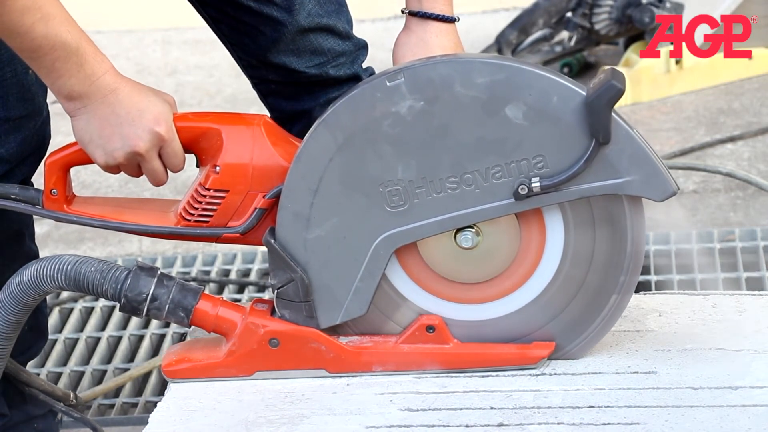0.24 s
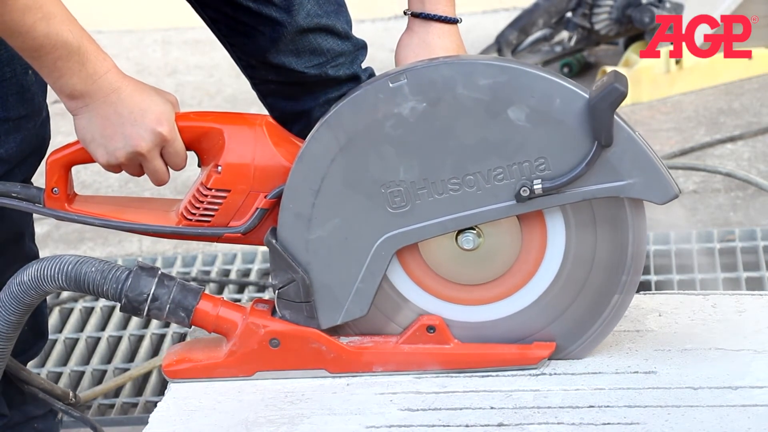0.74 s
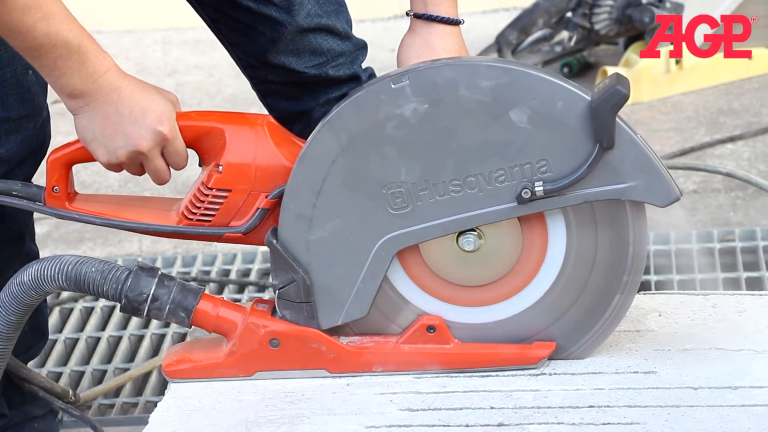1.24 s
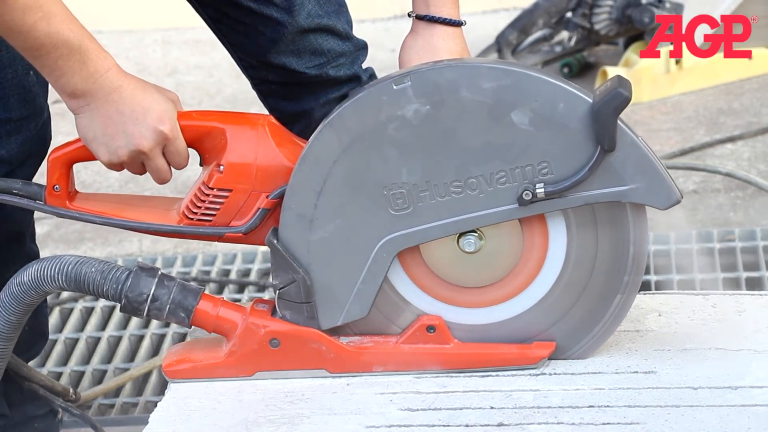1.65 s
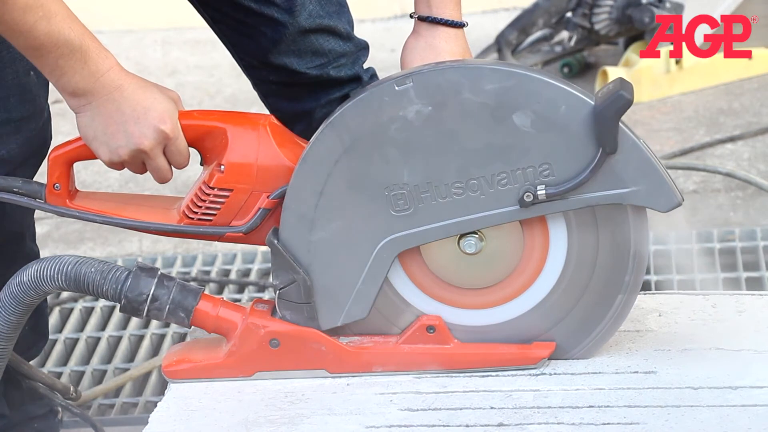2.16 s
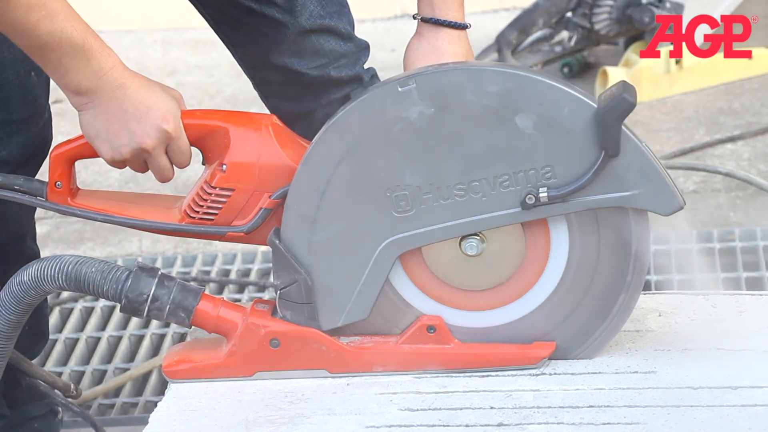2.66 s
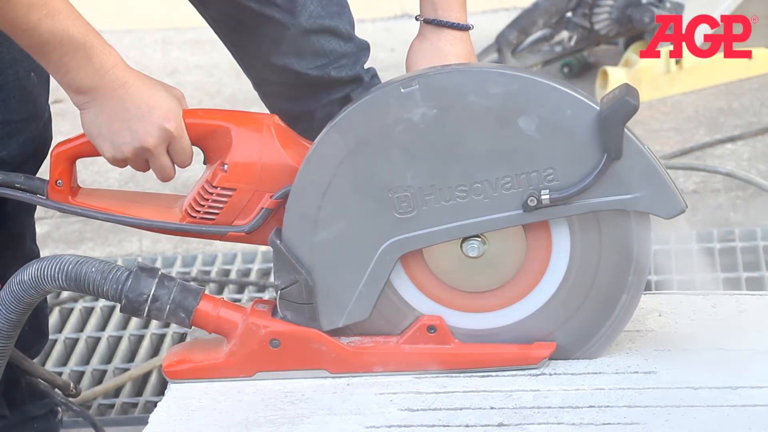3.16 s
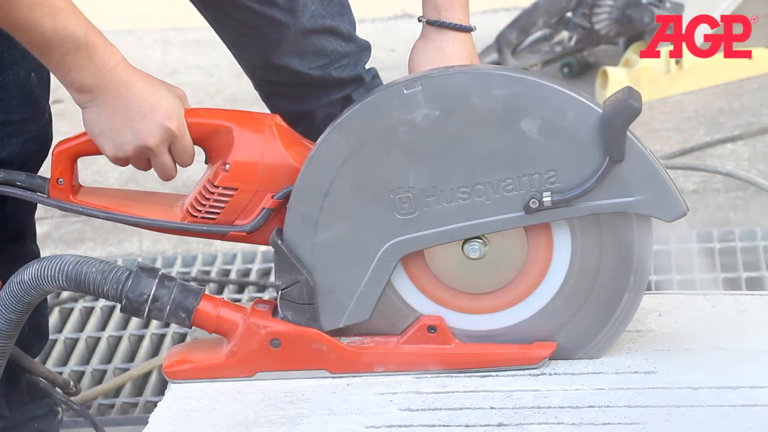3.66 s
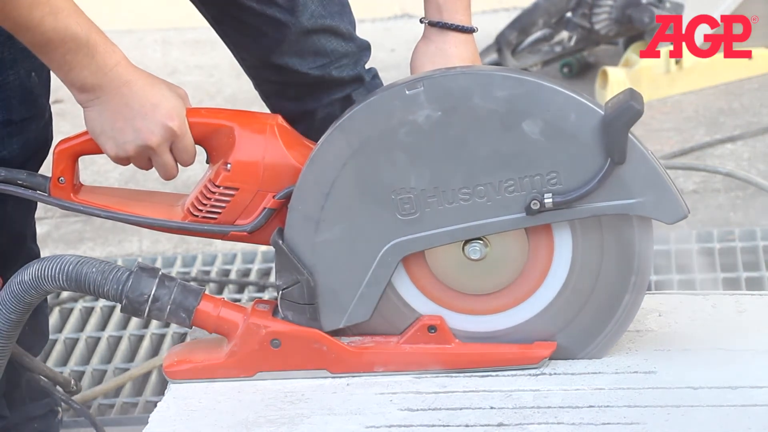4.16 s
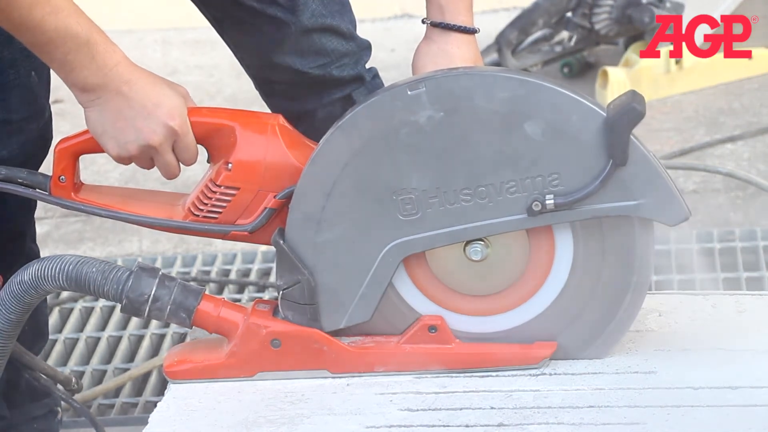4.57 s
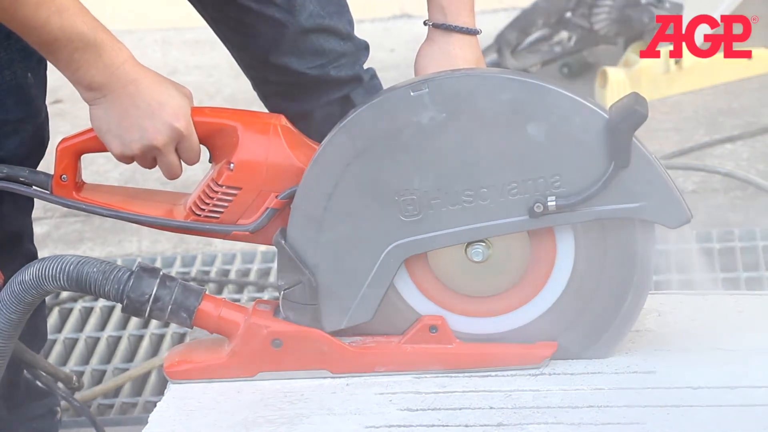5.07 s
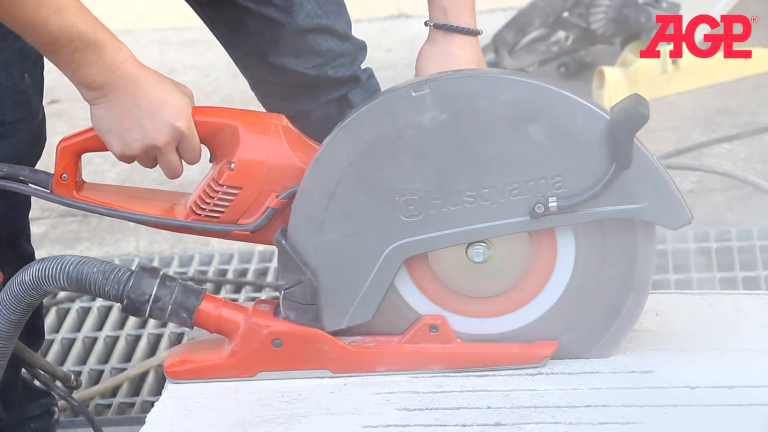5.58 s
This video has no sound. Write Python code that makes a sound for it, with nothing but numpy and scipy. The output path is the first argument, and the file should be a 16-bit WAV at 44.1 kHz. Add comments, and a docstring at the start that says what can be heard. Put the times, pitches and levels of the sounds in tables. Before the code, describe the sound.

A constant, harsh stone-cutting noise fills the whole stretch: shrill ringing blade, broader metallic rattle from its guard, crushed grit spraying, and a low fan rush. Small hard spots make brief squealing flares. The low drone flutters and surges irregularly, and late in the cut the loaded motor strains more heavily. Close stereo microphone in an open yard, slightly stronger on the left, almost no reverberation.

```python
"""An electric cut-off saw sinks its diamond blade evenly into a concrete slab, outdoors, close by.
From the first bite, rubbed grit rings the steel disc (sharp modes) and guard (broad modes), harder once a turn;
crushed grains hiss, the geared housing drones under a varying load, and the fan rushes below shaft tones and hums.
As the cut deepens the blade slows, its modes glide and many are damped, the grinding grows brighter,
and the motor strains louder."""
import sys
import numpy as np
from scipy import signal
from scipy.fft import rfft, irfft, next_fast_len
from scipy.io import wavfile
from scipy.ndimage import map_coordinates

SR = 44100
rng = np.random.default_rng(int(sys.argv[2]) if len(sys.argv) > 2 else 0)


def transcribe(signal):
    """Save signal, clipped to [-1, 1], as a 16-bit WAV file at the path in sys.argv[1]."""
    frames = np.atleast_2d(signal).T
    limited = np.clip(frames, -1, 1)
    pcm = np.round(limited * 32767).astype(np.int16)
    wavfile.write(sys.argv[1], SR, pcm)


N = 256220
TIME = np.arange(N) / SR
SIZE = next_fast_len(N)
HZ = np.fft.rfftfreq(SIZE, 1 / SR)
MAINS_HZ = 60

# blade speed: (time [s], speed [turns/s])
BLADE_SPEED = [(0, 51.35), (.55, 50.9), (1.2, 50.72), (2, 50.25), (2.3, 49.7), (2.8, 48.5), (3.3, 47.75),
               (3.8, 47.05), (4.6, 46.85), (4.9, 46.5), (5.3, 45.2), (5.6, 44.6), (5.81, 44.5)]
# likeness of the grinding in the two ears: (frequency [Hz], correlation [-])
EAR_LIKENESS = [(600, 1), (1400, 0.87), (3000, 0.9), (4500, 0.66), (6800, 0.39), (10000, 0.084),
                (13000, 0.6)]


def amp(db):
    """Decibels to gain."""
    return 10 ** (np.asarray(db) / 20)


def unit(x):
    """Scales to rms 1."""
    return x / np.sqrt(np.mean(x ** 2) + 1e-20)


def curve(rows):
    """Interpolates a (time, value) table to every sample."""
    return np.interp(TIME, *np.transpose(rows))


def spectrum(rows, axis=1):
    """Interpolates one table column over log frequency."""
    columns = np.transpose(rows)
    return np.interp(np.log(HZ + 1), np.log(columns[0] + 1), columns[axis])


def colour(x, gain):
    """Filters by a gain per frequency bin."""
    return irfft(rfft(x, SIZE) * gain, SIZE)[..., :N]


def causal(gain):
    """Minimum-phase filter of the given gains: it rings only after it is struck."""
    cepstrum = irfft(np.log(gain), SIZE)
    return gain * np.exp(1j * rfft(cepstrum * np.sign(np.fft.fftfreq(SIZE))).imag)


def noise():
    """White noise, rms 1."""
    return rng.standard_normal(N)


def wander(rate_hz):
    """Low-passed noise, rms 1."""
    return unit(colour(noise(), 1 / (1 + (HZ / rate_hz) ** 4)))


def pan(db):
    """Left and right gains for a left-minus-right level difference."""
    return amp(np.array([[.5], [-.5]]) * db)


def cut_depth(t):
    """Even feed: 0 at the first bite, 1 at full depth."""
    return t / TIME[-1]


def staged(depth, stages):
    """Interpolates values given at the first bite, half way in and at full depth."""
    return np.interp(depth, [0, .5, 1], stages)


def contact(turns, once_db=1.23, chatter_db=0.86, chatter_hz=90, lurch_db=0.42, lurch_hz=12):
    """Contact force: the rim, out of true, presses harder once a turn; stones in the concrete make it chatter."""
    once_per_turn = once_db * np.cos(2 * np.pi * turns)
    chatter = chatter_db * wander(chatter_hz)
    lurch = lurch_db * wander(lurch_hz)
    return unit(amp(once_per_turn + chatter + lurch))


def rim(turns, depth, memory_turns=14, size=1024):
    """The same diamonds pass every turn, so part of the rubbing repeats, changing with wear: (share, pattern)."""
    # repeating share of the rubbing power [-]: first bite, half way in, full depth
    repeat_share = [.22, .11, .14]
    keep = np.exp(-1 / memory_turns)
    fresh = rng.standard_normal((2, int(turns[-1]) + 2, size))
    # one-pole smoothing from turn to turn at each point of the rim
    worn = signal.lfilter([np.sqrt(1 - keep ** 2)], [1, -keep], fresh[:, 1:], axis=1, zi=keep * fresh[:, :1])[0]
    pattern = np.array([map_coordinates(side.ravel(), [turns * size], mode="nearest") for side in worn])
    return staged(depth, repeat_share), unit(pattern)


def scrape(diamonds):
    """Two unrelated rubbing streams: fresh grit plus the rim pattern."""
    share, pattern = diamonds
    grit = rng.standard_normal((2, N), np.float32)
    return np.sqrt(1 - share) * grit + np.sqrt(share) * pattern


def ring(force, diamonds, hz, width_hz, skirt):
    """Two-ear spectrum of a rubbed mode: one pole, with steeper flanks beyond skirt half-widths."""
    shared, opposed = rfft(np.float32(force * scrape(diamonds)), SIZE)
    near = abs(HZ - hz) < 5 * skirt * width_hz
    same = np.interp(HZ[near], *np.transpose(EAR_LIKENESS))
    side = np.array([[1], [-1]])
    drive = shared[near] * np.sqrt(1 + same) + side * opposed[near] * np.sqrt(1 - same)
    detune = 2j * (HZ[near] - hz) / width_hz
    response = np.zeros((2, len(HZ)), np.complex64)
    response[:, near] = drive / (1 + detune) / (1 + detune / skirt)
    return response


def strength(hz, stages_db, stone_width_hz=70):
    """Mode gain over time: cut depth damps some modes and wakes others; hard stones make near ones flare."""
    # hard stones: (time [s], 1/e half length [s], frequency [Hz], flare [dB])
    stones = [(.33, 0.05, 3825, 6), (.66, 0.034, 3900, 7), (0.698, .1, 2760, 4), (.75, 0.25, 2848, 2),
              (1.418, 0.091, 3250, 7), (1.53, .07, 4255, 5), (2.15, 0.2, 2747, 0.5), (2.15, 0.28, 5500, 7),
              (2.6, 0.066, 2747, 3), (2.82, 0.032, 2747, 6), (2.848, .06, 3870, 2), (3.07, .07, 5500, 7),
              (3.378, 0.051, 3920, 2), (3.8, 0.1, 4760, 6), (3.8, .1, 6195, 9), (4.498, .12, 2800, 1),
              (4.52, .07, 4446, 3), (5.77, .05, 4800, 5)]
    steps = np.linspace(0, TIME[-1], num=400)
    db = staged(cut_depth(steps), stages_db)
    for at_s, length_s, stone_hz, flare_db in stones:
        in_time = ((steps - at_s) / length_s) ** 2
        in_pitch = ((hz - stone_hz) / stone_width_hz) ** 2
        db = db + flare_db * np.exp(-in_time - in_pitch)
    return np.interp(TIME, steps, amp(db))


def blade(force, diamonds, depth, skirt=5.3, hold=0.14):
    """The disc sings in sharp modes that glide as the blade slows and sinks; friction evens out their swing."""
    # disc modes: (frequency half way in [Hz], drift over the cut [Hz], width [Hz], level at first bite [dB],
    # level half way in [dB], level at full depth [dB], left minus right [dB])
    modes = [(1875, -20, 48, -41.0, -41.5, -47.0, -6), (2147, -25, 26, -43.0, -44.0, -51.5, -7),
             (2290, -9, 50, -42.5, -39.0, -40.0, -4), (2464, 5, 46, -40.0, -38.5, -38.5, -5),
             (2746, -28, 22, -34.3, -31.2, -36.5, -2), (2848, -4, 27, -34, -35, -38, -5),
             (3049, -33, 24, -37.5, -39.0, -39.5, -6), (3276, -36, 32, -38.5, -39, -48.0, -2),
             (3852, 21, 39, -32.0, -33.0, -37, -5), (3904, -34, 31, -30.0, -37.5, -40.0, -3),
             (4208, -4, 12, -50.0, -40.5, -37.5, -9), (4247, -8, 14, -44.0, -36, -40.0, -5),
             (4280, -6, 20, -35.5, -47, -39.5, -5), (4350, -29, 33, -36, -40.5, -40, -6),
             (4446, 8, 20, -37.5, -36.0, -38.0, -6), (4493, -6, 32, -40.0, -39.0, -42.5, -10),
             (4692, 0, 23, -34.5, -38.0, -48.5, -4), (4726, 12, 20, -53.0, -35.5, -35, -3),
             (4796, 3, 16, -40.5, -38.0, -37.5, -4), (4855, -61, 33, -39.5, -39.0, -37.5, 0),
             (5305, -20, 50, -54, -42, -37, -4), (5360, -6, 16, -40, -39.5, -47, -8),
             (5492, -46, 28, -35.3, -36, -58, 1), (5736, -54, 30, -46, -48, -57.0, 4),
             (5865, 62, 24, -51.5, -48.0, -44.5, -15), (6197, -16, 11, -58, -44.0, -42.5, -1),
             (6378, 60, 40, -52.0, -43.5, -46.0, -4), (7443, 112, 45, -44.5, -44.0, -43.5, -8),
             (7735, 14, 36, -42.5, -42.5, -46, -5), (7937, 3, 30, -44.5, -48.0, -46.5, 3),
             (8224, 7, 20, -50, -47, -46, -7), (8595, 24, 20, -42.5, -46.0, -54.0, -3),
             (9041, 39, 197, -48.0, -42.0, -46.5, -2), (9303, 34, 23, -51.5, -48.0, -54.0, -6),
             (10194, 60, 97, -49, -47.5, -50, -6), (10660, 0, 150, -51, -50, -50, -3),
             (10885, 40, 35, -49, -47, -46.5, -3), (11605, -55, 60, -51.5, -49.0, -56.5, -3)]
    out = np.zeros((2, N))
    glide = 2 * np.pi * np.cumsum(depth - .5) / SR
    for hz, drift_hz, width_hz, *stages_db, side_db in modes:
        # one-sided spectrum gives a complex signal, so its pitch can be shifted
        song = np.fft.ifft(ring(force, diamonds, hz, width_hz, skirt), SIZE)[:, :N]
        swing = (song.real ** 2 + song.imag ** 2).sum(0)
        shift = np.float32(drift_hz * glide)
        shifted = song.real * np.cos(shift) - song.imag * np.sin(shift)
        held = shifted / (swing + swing.mean() / 10) ** (hold / 2)
        out += unit(held) * pan(side_db) * strength(hz, stages_db)
    return out


def guard(force, diamonds):
    """The guard rings in broad modes of fixed pitch."""
    # guard modes: (frequency [Hz], width of each of two equal poles [Hz], level at first bite [dB],
    # level half way in [dB], level at full depth [dB], left minus right [dB])
    modes = [(933, 130, -45.5, -47.0, -47.0, -2), (1373, 584, -38.0, -39.0, -41.0, -3),
             (1777, 118, -49.5, -54.5, -46.0, -5), (2117, 309, -40.5, -40.5, -41.5, -2),
             (2564, 190, -47.5, -40.5, -37.0, -5), (2660, 284, -42.5, -40.0, -41.0, -4),
             (3117, 93, -39.5, -39.5, -44.5, -7), (3333, 440, -37.5, -36.5, -36.5, -3),
             (3778, 278, -41.0, -38.5, -33.5, -7), (4198, 444, -33.5, -32.5, -34.5, -1),
             (4575, 254, -41.0, -38.5, -35.0, -7), (4742, 251, -43.5, -43.0, -42.0, -3),
             (5257, 983, -36.0, -34.5, -34.0, -2), (5627, 467, -41.0, -38.5, -35, -1),
             (6392, 629, -40.0, -38.0, -37.5, -1), (6862, 378, -40.0, -36.5, -35.5, -4),
             (7341, 103, -55.0, -47.5, -44.0, -2), (7995, 340, -45.0, -44.0, -42.0, -9),
             (9686, 417, -43.0, -41.5, -41.5, -3)]
    out = np.zeros((2, N))
    for hz, width_hz, *stages_db, side_db in modes:
        tone = irfft(ring(force, diamonds, hz, width_hz, skirt=1.0), SIZE)[:, :N]
        out += unit(tone) * pan(side_db) * strength(hz, stages_db)
    return out


def grinding(force, diamonds, depth, grain_db=1.5, follow=0.55, patchy_db=.5, patchy_hz=10):
    """Uneven grains are crushed in the slot; their spray follows the contact force only loosely."""
    # crushed concrete: (frequency [Hz], density at first bite [dB per Hz], change at full depth [dB],
    # left minus right [dB])
    grit = [(200, -100.0, -21.0, -3.0), (610, -84, 3, 4), (806, -69.5, -8.5, 1), (1010, -78.5, 8, -4.5),
            (1690, -72.5, -5, -2), (2730, -66.5, -1.5, -2), (3740, -66.5, -3.5, -3), (4700, -66.5, 2, -6),
            (6100, -74.5, -26, -10), (7600, -68, 3.5, -3), (10000, -71.5, -2, -1.5), (12000, -77, 2.1, -1),
            (15600, -87, 2, 0)]
    spray = unit(force ** follow * amp(grain_db * noise() + patchy_db * wander(patchy_hz)))
    left, other = scrape(diamonds) * spray
    same = spectrum(EAR_LIKENESS)
    right = colour(left, same) + colour(other, np.sqrt(1 - same ** 2))
    pair = np.array([left, right])
    shallow = amp(spectrum(grit)) * pan(spectrum(grit, axis=3)) * np.sqrt(SR / 2)
    deep = shallow * amp(spectrum(grit, axis=2))
    return (1 - depth) * colour(pair, shallow) + depth * colour(pair, deep)


def yard(x, wet_db=-19, t60_s=0.04, count=24):
    """Slab, operator and nearby things return a few early echoes, different in each ear."""
    delay_s = rng.uniform(.004, 0.059, (2, count))
    echoes = rng.choice([-1, 1], delay_s.shape) * amp(-60 * delay_s / t60_s)
    taps = np.zeros((2, N))
    np.put_along_axis(taps, (delay_s * SR).astype(int), echoes, 1)
    taps /= np.linalg.norm(taps, axis=1, keepdims=True)
    wet = amp(wet_db) * colour(x, rfft(taps, SIZE))
    return (x + wet) / np.sqrt(1 + amp(wet_db) ** 2)


def ears(x):
    """The cut lies to the right, so its sound reaches the left ear slightly late."""
    # (frequency [Hz], phase lag of the left ear [rad])
    lag = [(1500, 0), (3000, .2), (4500, .6), (5500, .6), (6500, 1.4), (9700, 1.3), (11000, .2), (12000, 0)]
    return colour(x, np.exp(.5j * spectrum(lag) * np.array([[-1], [1]])))


def hand_feed(sway_db=0.14, sway_hz=5.5):
    """Rubbing level [dB] as the hand pushes and eases, with random sway."""
    # (time [s], relative level [dB])
    rub = [(0.0, 1.8), (0.15, -2), (0.3, -0.3), (0.5, -1), (0.7, 0), (0.8, -0.5), (2.8, 0), (3.01, -1.5),
           (3.11, 0.1), (3.46, -0.8), (3.96, 0.2), (4.11, -1), (4.46, 0.7), (4.61, 0.5), (5.66, -0.5),
           (5.81, 0.5)]
    return curve(rub) + sway_db * wander(sway_hz)


def housing(turns, knock_share=0.54, jitter_s=0.00091, uneven_db=0.5, once_db=0.3, throb_db=2.0,
            burst_db=1, burst_hz=110, boom_hz=565, boom_width_hz=130, drone_db=-28, skirt=0.24, side_db=-3.5):
    """Motor torque pulses at twice the mains frequency knock the gears, and the housing drones."""
    # motor load: (time [s], drone level relative to drone_db [dB])
    load = [(0, 2.5), (.22, -6), (.34, 1.5), (.42, -6), (.49, 4), (.56, -3), (.65, 1), (.95, -0.5),
            (1.03, -4.5), (1.15, 1.5), (1.25, -.5), (1.68, 0), (1.79, -4), (1.88, 1), (1.95, -5),
            (2.1, 1.8), (2.6, 0.5), (3, -1), (3.23, -2), (3.65, 0.5), (4.55, -0.9), (4.66, -2.5),
            (4.8, 3.5), (4.89, -4), (4.97, 5.5), (5.05, -1), (5.18, 4), (5.42, 3.5), (5.68, -1),
            (5.78, 4.5)]
    # housing response: (frequency [Hz], relative gain [dB])
    resonance = [(250, -53), (345, -25), (400, -10), (440, -9.5), (480, -4), (555, 0.55), (600, 1.5),
                 (645, -5), (700, -10), (780, -13), (840, -28), (1100, -49.5)]
    pulse_s = np.arange(0, TIME[-1], 1 / (2 * MAINS_HZ))
    late, size, sign = rng.standard_normal((len(pulse_s), 3)).T
    knocks = np.zeros(N)
    at = np.clip((pulse_s + jitter_s * late) * SR, 0, N - 1).astype(int)
    knocks[at] = np.sign(sign) * amp(uneven_db * size)
    drive = np.sqrt(knock_share) * unit(knocks) + np.sqrt(1 - knock_share) * noise()
    drive = drive * amp(once_db * np.cos(2 * np.pi * turns))
    # torque pulses beat against the turning blade: a fast, regular throb
    drive = drive * amp(throb_db * np.cos(2 * np.pi * (2 * MAINS_HZ * TIME - turns)))
    # gears take up the load in short, irregular bursts
    drive = drive * amp(burst_db * wander(burst_hz))
    drone = unit(colour(drive, causal(amp(spectrum(resonance)))))
    # load swells the main resonance more than its skirts
    boom = colour(drone, np.exp(-((HZ - boom_hz) / boom_width_hz) ** 2))
    boom_db = drone_db + curve(load)
    skirt_db = boom_db.mean() + skirt * (boom_db - boom_db.mean())
    return (boom * amp(boom_db) + (drone - boom) * amp(skirt_db)) * pan(side_db)


def strain(turns, db_per_rps=3.0, waver_db=2.0, waver_hz=6, side_db=-4.0):
    """The slower the dragged blade, the louder the motor hums; the hum beats with the turning and flutters."""
    # (multiple of mains frequency [-], multiple of blade speed added [-], level at the lowest speed [dB])
    parts = [(8, -1, -43), (8, 0, -36.5), (10, -1, -35), (10, 0, -34)]
    speed = curve(BLADE_SPEED)
    out = np.zeros(N)
    for mains_multiple, blade_multiple, db in parts:
        cycles = mains_multiple * MAINS_HZ * TIME + blade_multiple * turns + rng.random()
        out += amp(db + waver_db * wander(waver_hz)) * np.sin(2 * np.pi * cycles)
    return np.sqrt(2) * out * amp(-db_per_rps * (speed - speed.min())) * pan(side_db)


def cooling_air(level_db=-43, side_db=-3.5, spread_db=-20):
    """The fan's low rush: shaped noise, nearly alike in both ears."""
    # (frequency [Hz], relative gain [dB])
    air = [(15, -54), (35, -36), (50, -17), (70, -18.5), (105, -16.5), (145, -6.5), (195, 3), (235, 2.5),
           (290, -1), (335, -1.5), (370, -1), (450, 4), (800, -23)]
    rush = noise() + amp(spread_db) * rng.standard_normal((2, N))
    return amp(level_db) * unit(colour(rush, amp(spectrum(air)))) * pan(side_db)


def tones(turns, depth, waver_db=1.7, waver_hz=2.25, slip_turns=0.005, side_db=-3.0):
    """Shaft orders sag with the blade, most fading as the slot steadies it; the hums hold their pitch."""
    # shaft tones: (multiple of blade speed [-], level at first bite [dB], level half way in [dB],
    # level at full depth [dB])
    orders = [(5.01, -48.5, -46.5, -62.5), (5.31, -57.5, -51.5, -60), (6.02, -49.5, -51, -59.5),
              (9, -40.5, -44, -60), (10.07, -45, -49, -48), (10.64, -43.5, -45, -52), (12, -39, -47, -48),
              (12.95, -46, -47.5, -56), (15, -57, -58, -60), (19.01, -49, -60.5, -62), (24, -46, -57, -56),
              (24.75, -56, -58, -64), (31.6, -60, -56, -54), (36.8, -44, -61, -66), (38.1, -52, -51, -62),
              (53.8, -46, -56, -62), (56.3, -44, -38.5, -62), (68.4, -66, -67, -47), (74, -44, -62, -65)]
    # mains and dust extractor: (frequency [Hz], level [dB])
    hums = [(120, -67.5), (288.7, -51)]
    out = np.zeros(N)
    shaft = turns + slip_turns * wander(waver_hz)
    for multiple, *stages_db in orders:
        tone = np.sin(2 * np.pi * (multiple * shaft + rng.random()))
        out += amp(staged(depth, stages_db)) * unit(tone * amp(waver_db * wander(waver_hz)))
    for hz, db in hums:
        hum = np.sin(2 * np.pi * hz * TIME)
        out += amp(db) * unit(hum * amp(waver_db * wander(waver_hz)))
    return out * pan(side_db)


def scene():
    """One contact force drives disc, guard and grit; cut depth colours them."""
    turns = np.cumsum(curve(BLADE_SPEED)) / SR
    depth = cut_depth(TIME)
    force, diamonds = contact(turns), rim(turns, depth)
    cut = blade(force, diamonds, depth) + guard(force, diamonds) + grinding(force, diamonds, depth)
    cut = ears(yard(cut)) * amp(hand_feed())
    return cut + housing(turns) + strain(turns) + cooling_air() + tones(turns, depth)


def record(dry, edge_hz=15750):
    """Band limit: a linear-phase low-pass."""
    low_pass = signal.firwin(511, edge_hz, window=("kaiser", 9), fs=SR)
    return signal.oaconvolve(dry, low_pass[None], "same")


dry = scene()
out = record(dry)
transcribe(out)
```